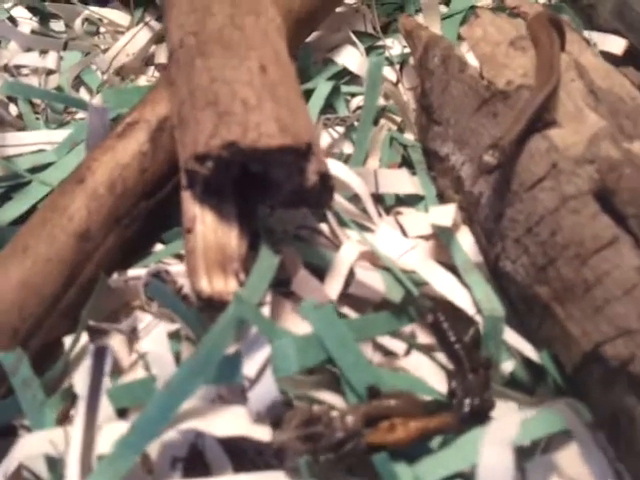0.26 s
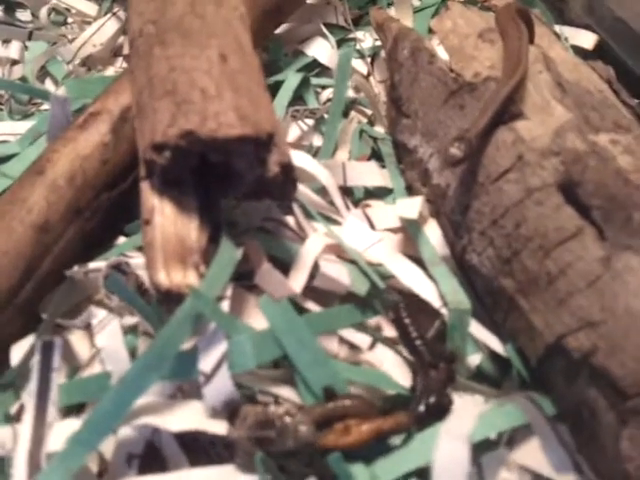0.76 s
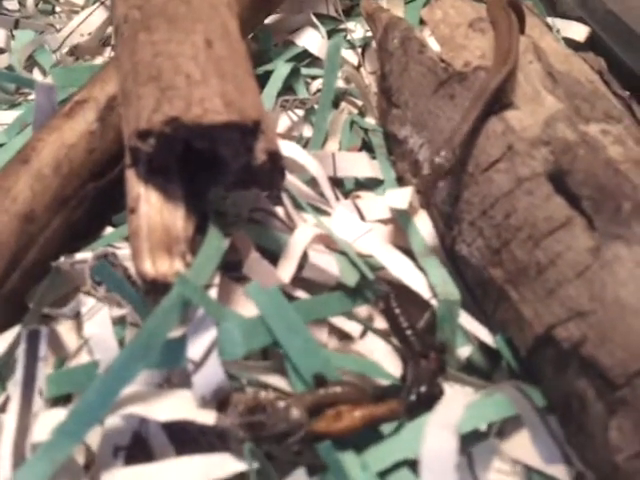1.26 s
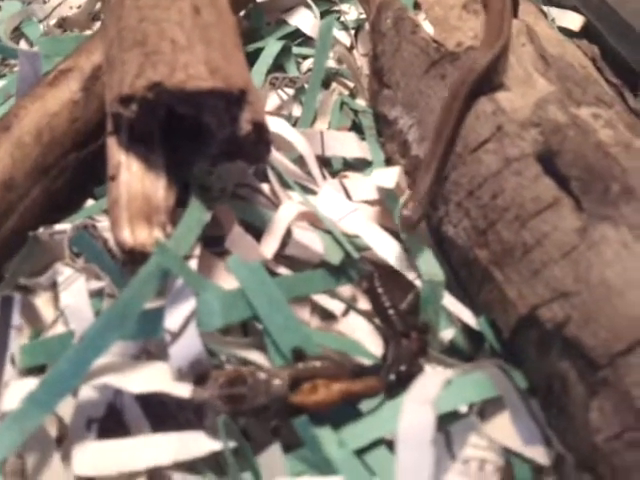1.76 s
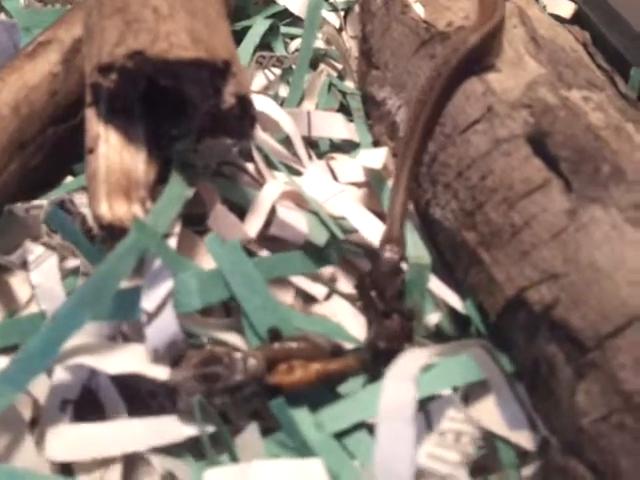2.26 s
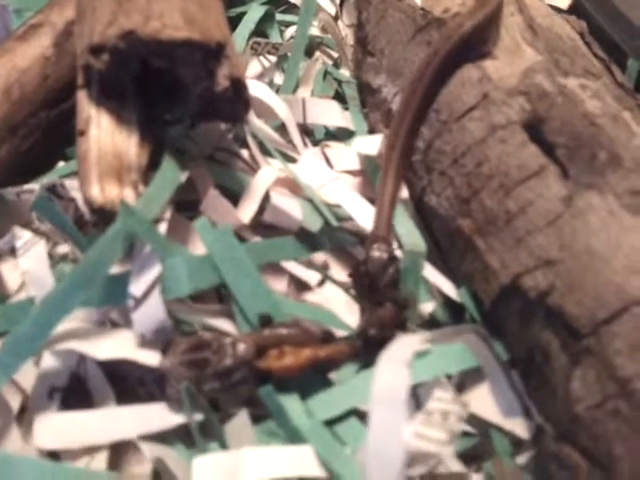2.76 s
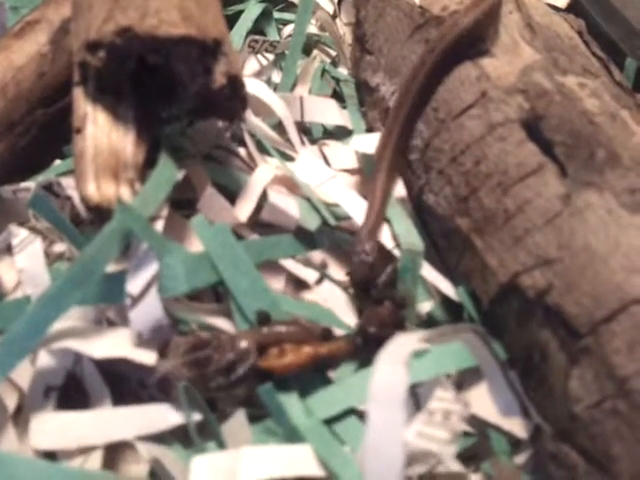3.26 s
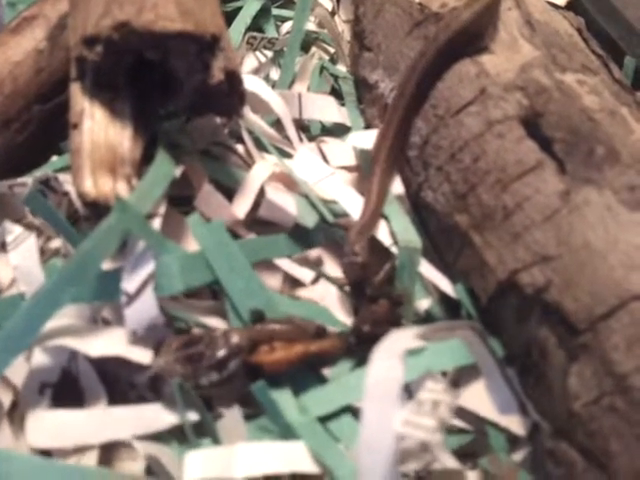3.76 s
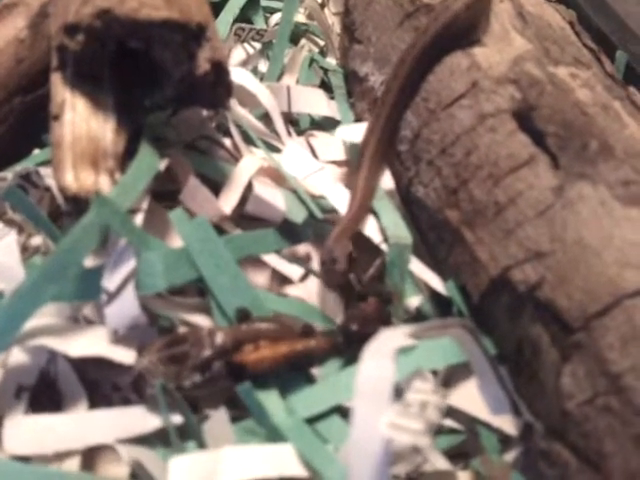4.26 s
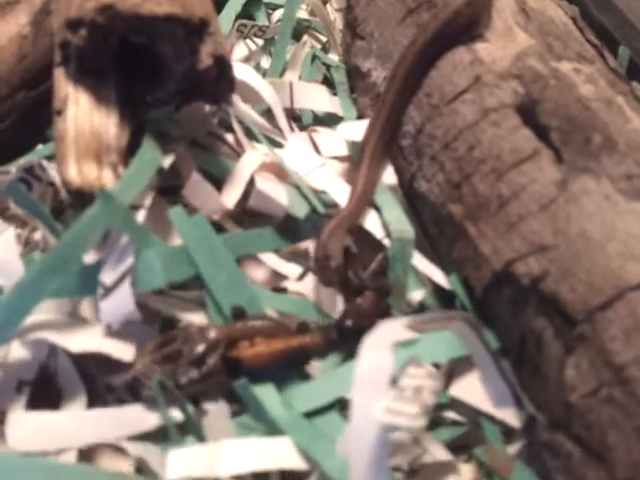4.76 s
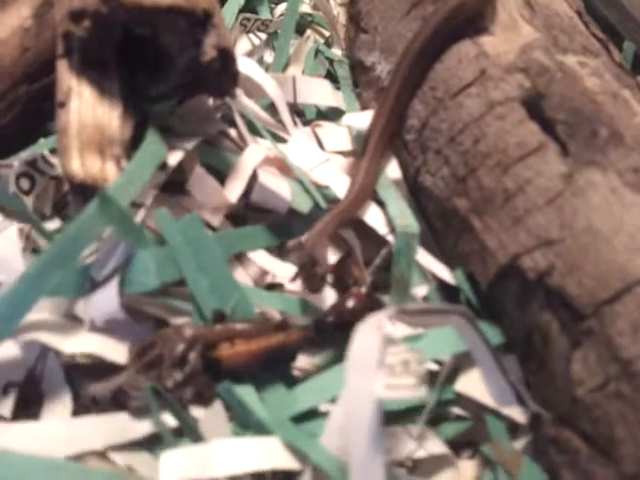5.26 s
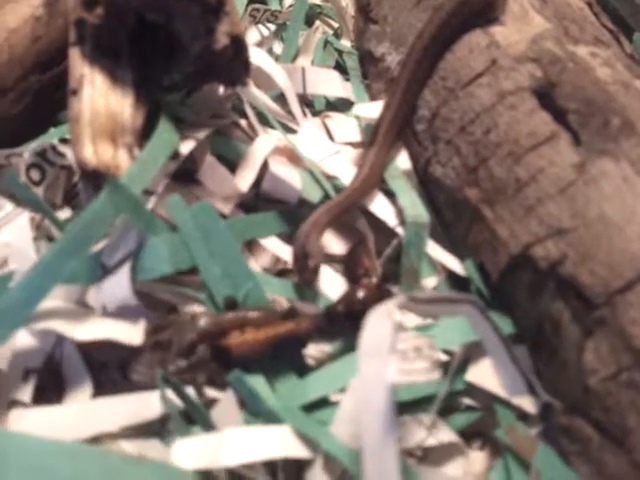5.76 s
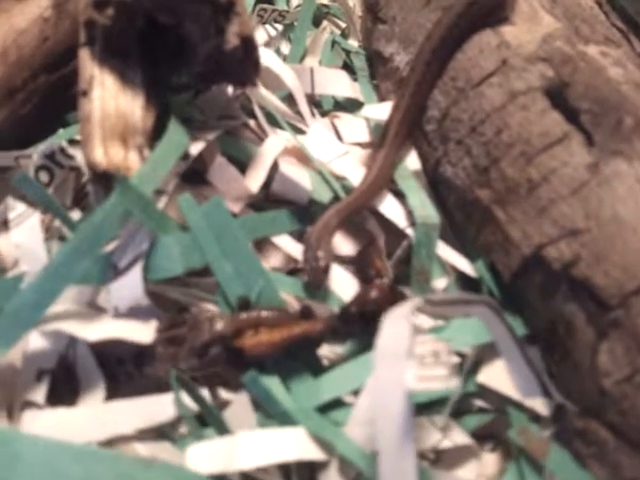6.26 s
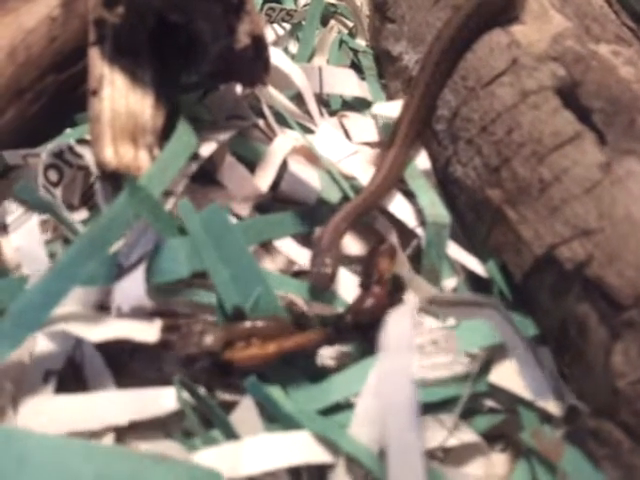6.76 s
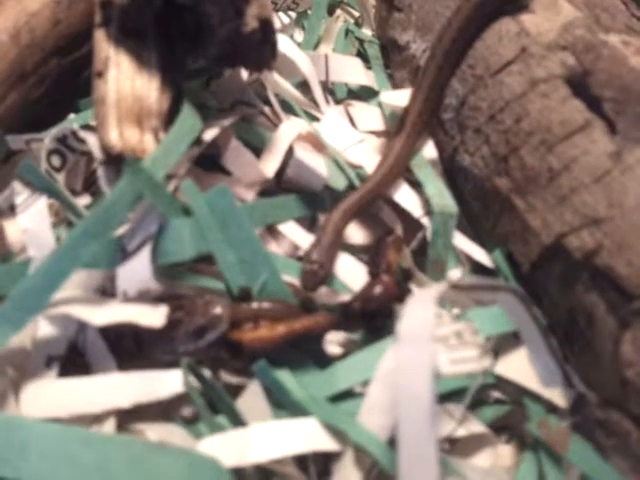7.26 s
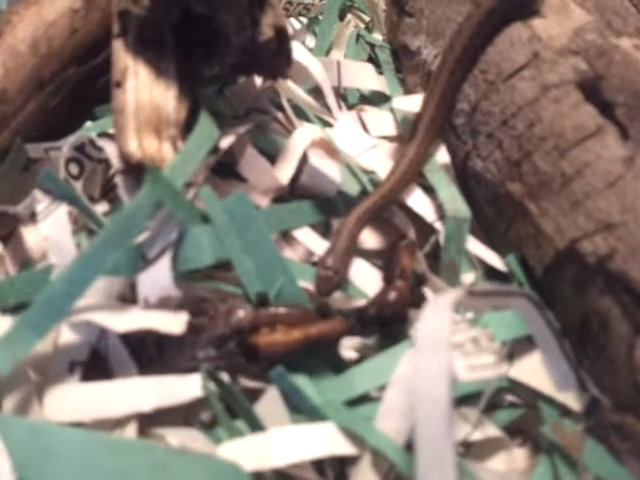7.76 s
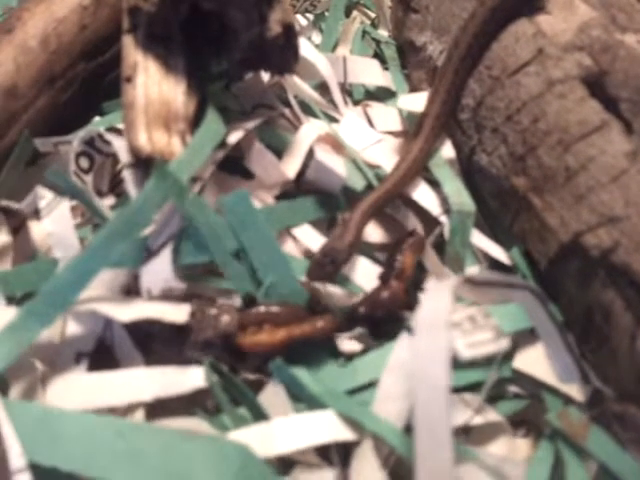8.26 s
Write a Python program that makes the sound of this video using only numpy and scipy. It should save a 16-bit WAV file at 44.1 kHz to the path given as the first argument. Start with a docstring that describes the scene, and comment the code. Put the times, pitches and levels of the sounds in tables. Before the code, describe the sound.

A few muffled, boomy bumps on the camera case come first, the loudest near the start. Then thin, bright paper ticks and short scrapes appear irregularly, gather into a busy crinkling burst midway, and fade to isolated snaps. Deep, soft ventilation hum runs throughout. Recorded close up indoors by a small handheld stereo camera, with the crackles shifting slightly left and right.

```python
"""Small snakes slide through shredded paper in a tank: noise scrapes and clumps of tiny rung creases
make the rustle, and noise cracks with short rings make the snaps. A room fan drones as slow sines
over shaped air noise. A hand shifts on the camera, bumping its case mostly in the first 0.6 s:
damped low rings, rattle and dull puffs, with a few higher taps later."""
import sys
import numpy as np
from scipy import signal
from scipy.fft import rfft, irfft, next_fast_len
from scipy.io import wavfile
from scipy.ndimage import uniform_filter1d, map_coordinates

SR = 44100
rng = np.random.default_rng(int(sys.argv[2]) if len(sys.argv) > 2 else 0)


def unload_wav(signal):
    """Save mono or channel-first audio to the path in sys.argv[1] as 16-bit WAV at rate SR, clipped to [-1, 1]."""
    wavfile.write(
        sys.argv[1],
        SR,
        np.round(np.clip(np.atleast_2d(signal).T, -1, 1) * 32767).astype(np.int16),
    )


N = 376173

# Phase between the ports. Each row: frequency in Hz, left port's lead in radians.
PORT_LEAD = [(300, 0), (430, -0.47), (690, 4), (1030, 0.3), (1300, 1.5), (3400, 1.5), (14000, 2)]
# A hollow among the bedding: every crack sets it ringing and it colours the scrape.
HOLLOW_HZ, HOLLOW_T60_S = 3195, 0.017


def amp(db):
    """Decibels to gain."""
    return 10 ** (np.asarray(db) / 20)


def unit(x):
    """Scaled to rms 1."""
    return x / np.sqrt(np.mean(x ** 2) + 1e-20)


def along(points, hz):
    """Value at hz, interpolated between (Hz, value) points on a log axis."""
    f, v = np.transpose(points)
    return np.interp(np.log(hz + 1), np.log(f + 1), v)


def curves(rows):
    """One value per sample for each column after the time in seconds."""
    s, *cols = np.transpose(rows)
    return [np.interp(np.arange(N) / SR, s, c) for c in cols]


def wobble(knots_per_s):
    """A smooth random curve through normally distributed knots."""
    knots = rng.standard_normal(int(N * knots_per_s / SR) + 4)
    return map_coordinates(knots, [np.arange(N) * knots_per_s / SR])


def filtered(x, response):
    """x times a complex response of frequency."""
    m = next_fast_len(N + SR // 2)
    return irfft(rfft(x, m) * response(np.fft.rfftfreq(m, 1 / SR)), m)[..., :N]


def resonance(f, hz, width_hz):
    """Complex band-pass response of a damped resonator, gain 1 at hz."""
    return 1j * f * width_hz / (hz * hz - f * f + 1j * f * width_hz)


def panned(db):
    """Left and right gains for a left-right level difference."""
    return amp(np.array([db / 2, -db / 2]))


def ports(pair):
    """Two microphone ports whose likeness, phase and level balance vary with frequency."""
    # Each row: frequency in Hz, left-right likeness from 0 to 1.
    port_likeness = [(30, 0.66), (70, 0.85), (150, 0.98), (300, 0.99), (450, 1), (700, 0.12), (1500, 0.61),
                     (4000, 0.48), (14000, 0.2)]
    # Each row: frequency in Hz, left-right level difference in dB.
    port_tilt = [(60, -2.5), (150, -1.5), (380, 3.5), (950, 6), (2380, -0.5), (5980, 4), (15000, 2.5)]

    def right(hz):
        alike = np.clip(along(port_likeness, hz), 0, 1)
        return [alike * np.exp(-1j * along(PORT_LEAD, hz)), np.sqrt(1 - alike ** 2)]

    both = np.array([pair[0], filtered(pair, right).sum(axis=0)])
    return filtered(both, lambda hz: panned(along(port_tilt, hz)))


def add(out, s, sound):
    """Mixes a short stereo sound in at s seconds."""
    piece = out[:, round(s * SR):round(s * SR) + sound.shape[-1]]
    piece += sound[..., :piece.shape[1]]


def rustle(pops_db=-4, idle_pops_db=-1):
    """Scales drag over the strips: a grainy scrape of shifting colour, with creases popping in it."""
    # Scrape spectrum. Each row: frequency in Hz, relative density in dB per Hz.
    paper_spectrum = [(450, -16), (700, -9.5), (1100, -2.5), (1800, -7), (2400, -1), (3100, -4.5),
                      (4200, -3.5), (5200, -1.5), (7500, -1), (11200, -2), (13500, -5.5), (14600, -9)]
    # Balance of the bedding. Each row: frequency in Hz, left-right level difference in dB.
    paper_tilt = [(1500, -0.5), (3200, 3), (5500, -3), (9000, 0.5), (13000, -5)]
    # Faint stirring of the whole bed. Each row: time in seconds, level in dB.
    stir_levels = [(0, -59), (.3, -57), (3.2, -55.5), (3.42, -62), (3.6, -57), (7, -53), (7.4, -63),
                   (8.53, -57)]
    hollow_width_hz = np.log(1000) / (np.pi * HOLLOW_T60_S)
    hollow_db = 2  # resonance over the direct scrape

    def colour(f):
        hollow = 1 + amp(hollow_db) * resonance(f, HOLLOW_HZ, hollow_width_hz)
        return amp(along(paper_spectrum, f)) * hollow

    grain = amp(0.97 * wobble(35) + 1.6 * wobble(250))
    drag = grain * patchy(rng.standard_normal((2, N)), depth_db=2.0)
    scrape = unit(ports(filtered(drag, colour)))
    pops = creases(most_db=13, count=4000)
    ticks = creases(most_db=12, count=2500)
    slides, stir = sliding(), amp(curves(stir_levels)[0])
    dragged = np.hypot(slides, stir) * scrape
    # a stirring bed ticks more, relative to its scrape, than a slide pops
    popped = amp(pops_db) * slides * pops + amp(idle_pops_db) * stir * ticks
    return filtered(dragged + popped, lambda f: panned(along(paper_tilt, f)))


def patchy(pair, depth_db):
    """Random colour drifting over tens of ms, as different strips take over."""
    z = signal.stft(pair, nperseg=256)[2]
    field = rng.standard_normal(z.shape[1:])
    field = uniform_filter1d(field, size=5, axis=0)  # across frequency
    field = uniform_filter1d(field, size=10, axis=1)  # across time
    return signal.istft(z * amp(depth_db * unit(field)), nperseg=256)[1][:, :N]


def creases(most_db, count, centre_hz=8800, spread=.22, cycles=26., spread_db=4.5, rough=.045):
    """Tiny creases pop in clumps, each with its own pitch, size and phase at each port."""
    pace = np.cumsum(amp(5 * wobble(40)))
    when, size, left, right = rng.random((count, 4)).T
    n = np.arange(SR // 200)
    at = np.searchsorted(pace, when * pace[-1])[:, None] + n
    hz = np.clip(centre_hz * np.exp(spread * rng.standard_normal((count, 1))), 900, 14000)
    turns = hz * n / SR
    decay = amp(-60 * turns / cycles)  # 60 dB down after that many cycles
    gain = amp(np.minimum(-spread_db * np.log(size), most_db))[:, None] * decay

    def heard(phase_turns):
        # a crease never rings cleanly: its phase walks at random
        ragged = turns + rough * np.cumsum(rng.standard_normal(turns.shape), axis=1)
        ring = gain * np.sin(2 * np.pi * (ragged + phase_turns[:, None]))
        return np.pad(np.bincount(at.ravel(), ring.ravel()), (0, N))[:N]

    return unit(np.array([heard(left), heard(right)]))


def sliding():
    """Gain of bodies dragging over strips: each slide catches, drifts and settles."""
    # Each row: start in seconds, length in seconds, level in dB as it catches, level in dB as it lets go.
    slide_rows = [(0.24, 0.36, -49.5, -62), (0.662, 0.046, -49.5, -55), (0.757, 0.027, -33, -53),
                  (1.23, .025, -45, -40), (1.259, 0.075, -37.5, -45), (1.73, 0.12, -53.5, -49.5),
                  (2.146, 0.044, -48.5, -53), (2.302, 0.184, -49, -37), (3.465, 0.36, -48, -53),
                  (3.858, 0.13, -46.5, -40.5), (4.064, 0.19, -49, -45), (4.212, 0.055, -35.5, -37),
                  (4.286, 0.071, -37.5, -41), (4.491, 0.041, -39, -43.5), (4.577, 0.025, -44.5, -35),
                  (4.612, 0.16, -35.5, -51), (4.768, 0.081, -30, -49.5), (4.874, 0.02, -40, -45),
                  (4.931, 0.083, -35.5, -41), (5.013, 0.055, -34, -39), (5.063, 0.065, -32, -40),
                  (5.133, 0.046, -43, -36), (5.234, 0.12, -40.5, -34.5), (5.429, 0.027, -44, -58),
                  (5.937, 0.027, -49, -52), (6.759, 0.036, -45, -39), (6.818, 0.027, -38.5, -46),
                  (7.716, 0.14, -54, -56), (8.057, 0.097, -51, -47.5), (8.17, 0.09, -39.5, -50.5),
                  (8.26, 0.092, -45, -55), (8.496, .04, -41.5, -33.5)]
    catch_db_per_s, settle_db_per_s = 1900, 700
    t, power = np.arange(N) / SR, np.zeros(N)
    for s, length_s, catch_db, end_db in slide_rows:
        end = s + length_s
        drop_db = catch_db_per_s * np.maximum(s - t, 0) + settle_db_per_s * np.maximum(t - end, 0)
        near = drop_db < 60
        level_db = np.interp(t[near], [s, end], [catch_db, end_db])
        power[near] += amp(2 * (level_db - drop_db[near]))
    return np.sqrt(power)


def fan():
    """The unbalanced shaft throbs once a turn; blade tones flutter with the flow."""
    # Each row: time in seconds, mean rms level of the throb in dB.
    throb_levels = [(0.0, -34), (1.61, -34), (4.92, -33), (5.08, -37), (6.3, -38), (7.58, -33), (8.53, -32)]
    # Each row: multiple of the shaft speed, mean rms level in dB.
    blade_tones = [(5, -40.5)]
    shaft_hz = 35.05
    phase = 2 * np.pi * shaft_hz * np.arange(N) / SR + 0.29 * wobble(1.5)
    throb = amp(curves(throb_levels)[0] + 0.33 * wobble(24)) * np.sin(phase)
    blades = sum(amp(db + 0.74 * wobble(4.6)) * np.sin(k * phase + 0.27 * wobble(8.3))
                 for k, db in blade_tones)
    return np.sqrt(2) * (throb + blades)


def room():
    """Broad air noise, and narrow bands of it ringing in hollow spaces."""
    # Each row: frequency in Hz, relative density in dB per Hz.
    air_spectrum = [(20, -8.5), (60, -2.5), (110, -8.5), (150, -4.5), (250, -9), (345, -6.5), (370, -18),
                    (460, -41), (600, -24), (900, -35), (1300, -27.5), (1900, -27.5), (2500, -28),
                    (4200, -33.5), (8000, -34), (14600, -38)]
    # Each row: centre in Hz, width in Hz, rms level in dB ahead of the ports.
    cavity_bands = [(190.7, 32.5, -47.5), (411.4, 10, -46.5), (523, 6.6, -65), (697.2, 14.5, -59),
                    (788, 6, -84), (1013, 24, -64), (1213, 13, -69.5)]
    air_db = -41
    noise = rng.standard_normal((2, N))
    air = unit(filtered(noise, lambda f: amp(along(air_spectrum, f))))
    rings = sum(amp(db) * unit(filtered(noise, lambda f: resonance(f, hz, width_hz)))
                for hz, width_hz, db in cavity_bands)
    return ports(amp(air_db + 0.64 * wobble(3.313)) * air + rings)


def handling():
    """Fingers bump the case: a low ring, a dull puff and a short rattle; a few taps ring higher."""
    # Each row: time in seconds, strength in dB, case pitch in Hz,
    # rattle and puff gain relative to the ring in dB, grip's 60 dB decay in seconds.
    bump_rows = [(0.017, -6.5, 164, -54, 0.077), (0.288, -0.5, 166, -43, 0.062),
                 (0.345, -13, 154, -40, 0.1), (0.385, -15, 152, -48, 0.061),
                 (0.419, -12.5, 146, -28.5, 0.1), (0.46, -11.5, 153.6, -32, 0.09),
                 (0.484, -11, 179, -36.5, 0.084), (0.518, -9, 155, -35.5, 0.14),
                 (0.565, -13.5, 153, -48, 0.085), (0.588, -12, 155, -36, 0.14),
                 (6.617, -19, 235, -42, 0.13)]
    # Dull taps. Each row: time in seconds, strength in dB, pitch in Hz.
    tap_rows = [(4.764, -33.5, 1036), (5.0584, -38, 1047), (6.818, -29, 1007)]
    # Loose parts of the case. Each row: pitch in Hz, mean relative level in dB.
    loose_parts = [(540, 4.5), (800, 2), (990, 2.5), (1230, 3.5)]
    out, t = np.zeros((2, N)), np.arange(SR // 4) / SR
    dull = signal.butter(2, [350, 1000], "bandpass", fs=SR)

    def ring(hz, t60_s, rise_s):
        return np.sin(2 * np.pi * hz * t) * amp(-60 * t / t60_s) * (1 - np.exp(-t / rise_s))

    def rattle():
        return sum(amp(db + rng.normal(0, 5.1)) * rng.choice([-1, 1]) * ring(hz, 0.097, 0.0048)
                   for hz, db in loose_parts)

    for s, db, hz, rattle_db, t60_s in bump_rows:
        grip = amp(-60 * (t / t60_s) ** 2)  # the hand closes on the case and stops its ring
        body = grip * (ring(hz, 0.13, 0.015) + amp(-10.0) * ring(1.595 * hz, 0.062, 0.0072))
        parts = np.array([rattle(), rattle()])
        puff_gain = amp(9.5 - 60 * t / 0.063) * (1 - np.exp(-t / 0.0018))
        puff = puff_gain * unit(signal.lfilter(*dull, rng.standard_normal((2, len(t)))))
        add(out, s, amp(db) * (body + amp(rattle_db) * (parts + puff)))
    for s, db, hz in tap_rows:
        add(out, s, amp(db) * panned(4.4)[:, None] * ring(hz, 0.098, 0.007))
    return out


def snaps():
    """A bent strip flips: a sharp crack around its own pitch, and a short tail off the tank walls."""
    # Each row: time in seconds, nominal peak in dB, centre in Hz, left-right level difference in dB.
    snap_rows = [(0.416, -29, 3000, 3.0), (0.456, -26.5, 3040, 4), (0.5127, -25.5, 4940, 3),
                 (0.587, -29.5, 5140, 5), (0.7561, -12.5, 5570, 1), (1.056, -23, 5530, 0),
                 (1.2227, -25, 10400, -5), (1.259, -23, 8700, -7), (1.967, -19, 8700, -1),
                 (2.2745, -27, 8500, 5), (2.328, -25, 9360, 3), (2.938, -28, 7600, -2),
                 (3.0715, -23, 11300, -6), (3.197, -24, 10500, -5), (3.4663, -33, 9000, 0),
                 (3.5327, -29, 8500, 0), (3.554, -21, 7760, 1), (3.576, -31, 6500, 0),
                 (3.632, -26, 5030, 3), (3.7913, -29, 9020, 2.5), (3.906, -19, 9700, 0),
                 (3.938, -22, 8040, -2), (3.9718, -15.5, 7800, -6), (4.0632, -29, 8340, -1.0),
                 (4.115, -22.5, 8600, -5), (4.131, -25, 5660, 1), (4.191, -28, 4000, 1),
                 (4.2035, -23, 7120, -7), (4.4905, -37, 6000, 0), (4.5745, -28, 9000, -5),
                 (4.591, -28, 9000, -2), (4.605, -22, 8520, -8), (4.7653, -12, 8300, 3),
                 (4.8732, -25, 3050, 3), (4.921, -18, 8900, -2), (4.935, -22, 3120, 7),
                 (5.011, -20.5, 3100, 5), (5.0611, -22, 3300, 9), (5.234, -29, 9100, 2.0),
                 (5.3448, -23, 7050, 1.0), (5.3773, -21, 8180, -0.5), (5.9364, -26, 7660, 3.5),
                 (5.9545, -23, 7250, 4), (6.1759, -36, 6220, 5), (6.9234, -23.5, 8150, 5),
                 (7.0566, -21, 8100, 2), (8.09, -29, 7300, 3), (8.177, -23.5, 6560, 13),
                 (8.3699, -28, 8200, -4), (8.4907, -20, 5700, 0.5)]
    crest_db = 15  # nominal peak over rms
    hollow_db = -11
    out, t = np.zeros((2, N)), np.arange(SR // 10) / SR
    wide = signal.butter(2, [3000, 11500], "bandpass", fs=SR)

    def ring(hz):
        lag = np.array([[0], [along(PORT_LEAD, hz)]])
        return np.sin(2 * np.pi * (hz * t + rng.random()) - lag)

    for s, db, hz, pan_db in snap_rows:
        noise = rng.standard_normal((2, len(t)))
        band = signal.butter(2, [hz / 1.44, hz * 1.63], "bandpass", fs=SR)
        crack = amp(-3.0) * unit(signal.lfilter(*band, noise))
        crack += amp(1.0 - 60 * t / 0.038) * ring(hz)
        crack += amp(-1.5 - 60 * t / 0.011) * unit(signal.lfilter(*wide, noise[::-1]))  # ports swapped
        shape = amp(-60 * t / 0.027) + amp(-10.5 - 60 * t / 0.1)  # crack, then tail
        hollow = amp(hollow_db - 60 * t / HOLLOW_T60_S) * ring(HOLLOW_HZ)
        add(out, s, amp(db - crest_db) * panned(pan_db)[:, None] * (crack * shape + hollow))
    return out


def scene():
    """All sources at the two ports."""
    return rustle() + fan() + room() + handling() + snaps()


def record(dry):
    """The camera keeps nothing above its band limit."""
    top_hz = 14650
    return filtered(dry, lambda hz: hz < top_hz)


dry = scene()
out = record(dry)
unload_wav(out)
```